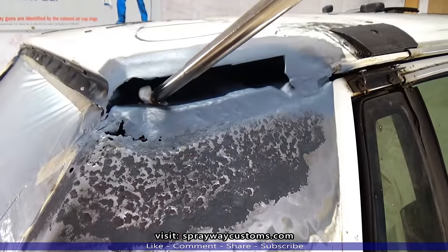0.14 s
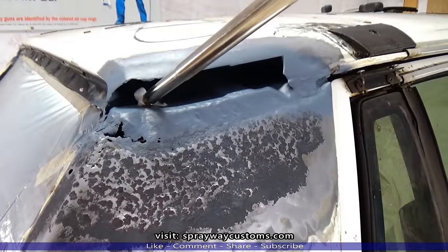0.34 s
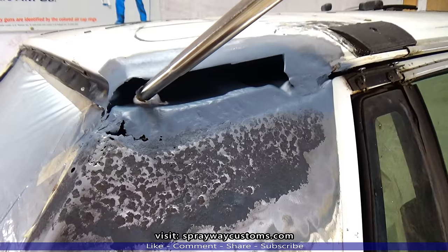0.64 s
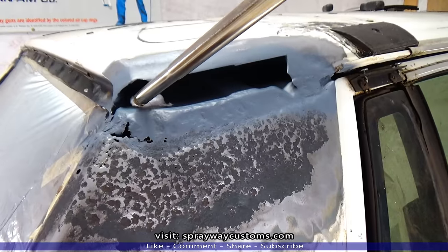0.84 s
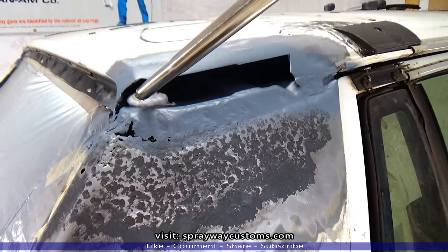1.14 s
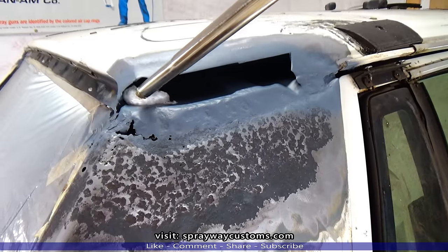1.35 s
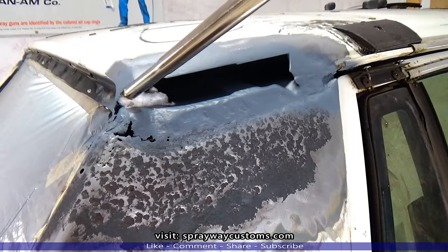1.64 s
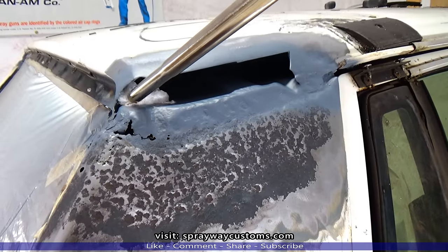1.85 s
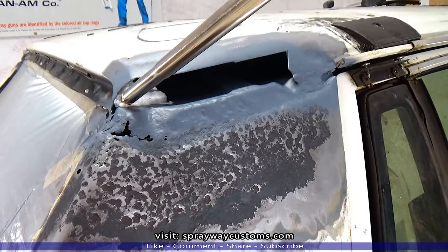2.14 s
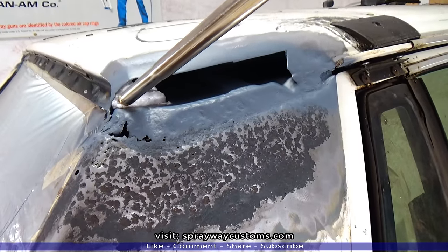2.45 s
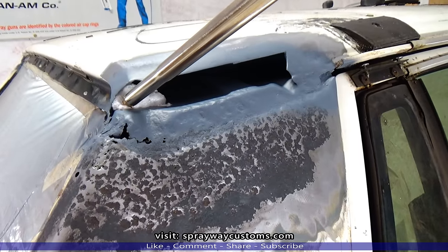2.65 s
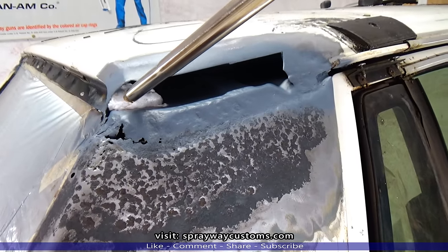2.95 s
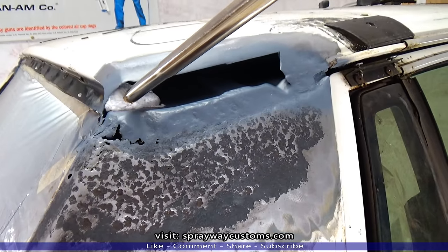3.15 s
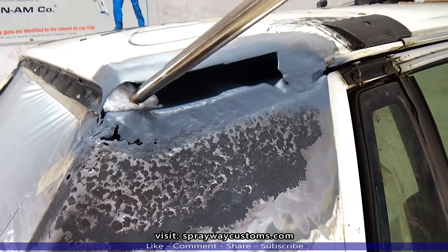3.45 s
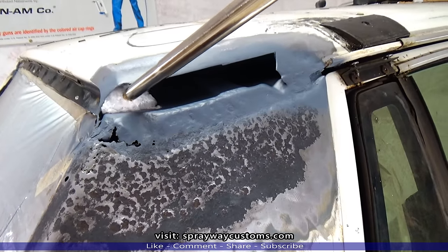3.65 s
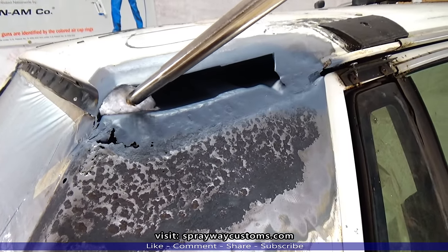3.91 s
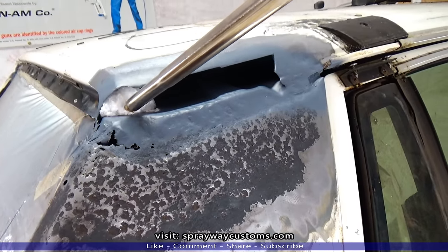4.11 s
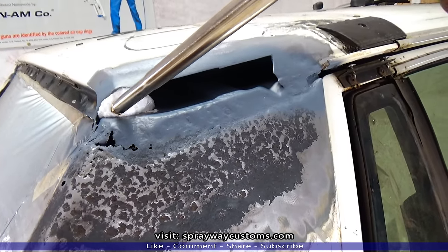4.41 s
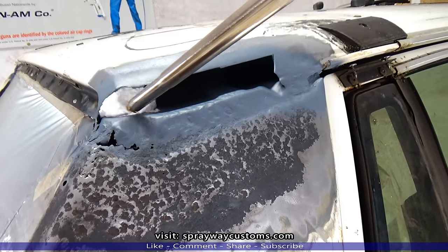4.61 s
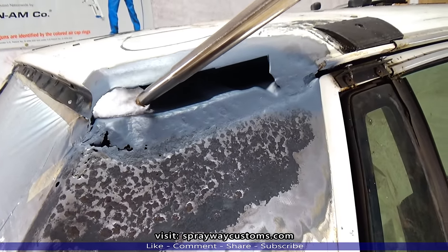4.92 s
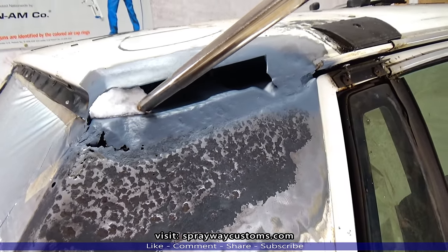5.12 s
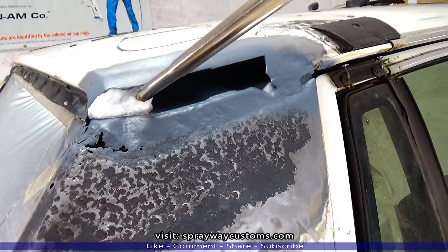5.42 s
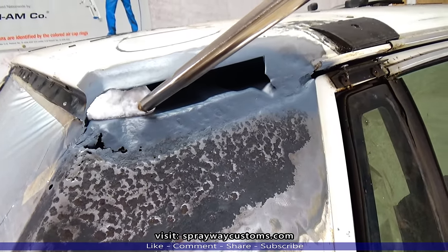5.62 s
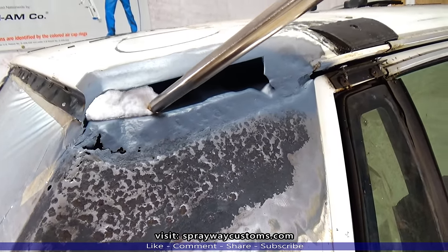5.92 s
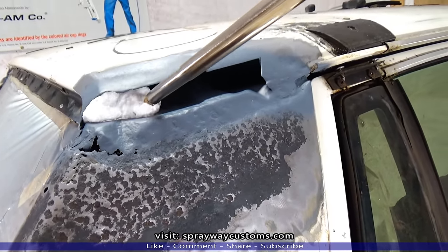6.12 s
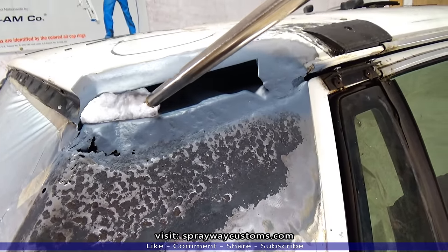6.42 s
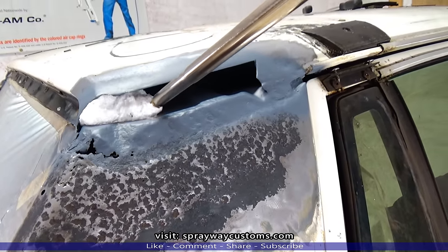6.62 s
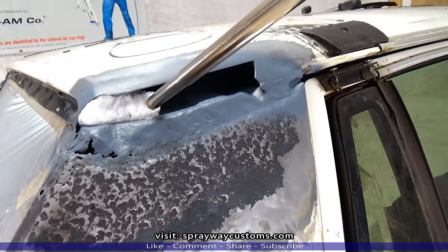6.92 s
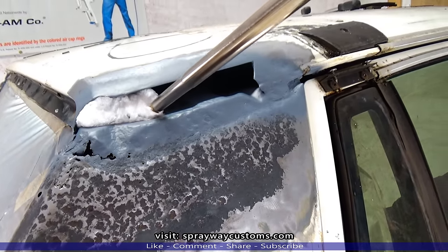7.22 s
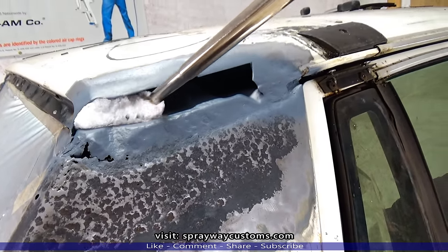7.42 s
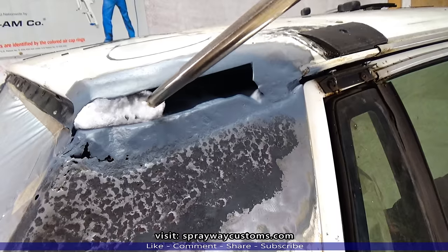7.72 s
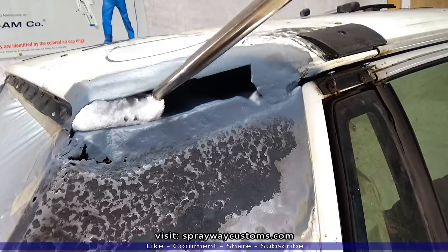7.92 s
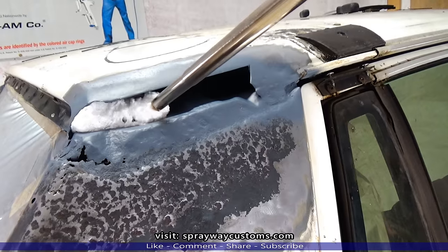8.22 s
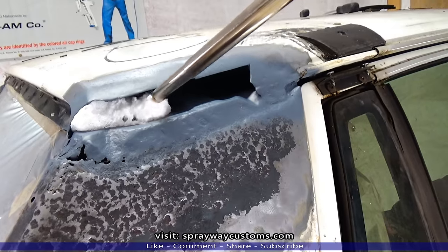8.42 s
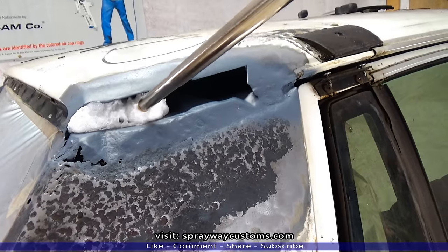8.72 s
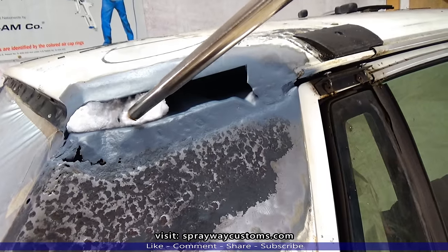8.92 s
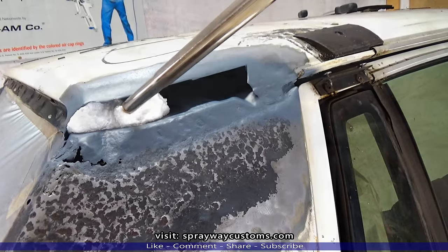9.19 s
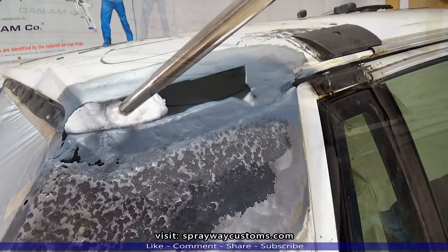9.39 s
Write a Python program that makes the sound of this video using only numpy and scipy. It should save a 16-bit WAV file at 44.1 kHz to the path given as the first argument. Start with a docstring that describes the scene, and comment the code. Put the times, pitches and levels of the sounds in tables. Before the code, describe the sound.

Close up in a small, fairly dry garage, foam oozes from a metal nozzle with irregular tiny clicks and pops. The nozzle occasionally knocks thin sheet metal, most strongly just after one second. Popping grows louder and denser around three seconds, then thins; from about six seconds, short hissing spurts and a rough gassy sputter join in. Soft room noise and a barely audible hum lie underneath.

```python
"""In a garage, expanding foam sputters out of a long metal nozzle into a slot in a car panel.
Gas pockets burst at the tip one by one: each click sets the modes of nozzle mouth and slot ringing.
Longer gas bursts fall among the clicks, and from about 6 s spurts join them: shaped noise with a
treble jet hiss; gas also seeps through the foam. The nozzle now and then knocks the sheet metal, a
filtered click into the panel modes. Room noise and a faint hum of narrow-band noise lie below."""
import sys
import numpy as np
from scipy import signal
from scipy.fft import rfft, irfft, next_fast_len
from scipy.io import wavfile
from scipy.ndimage import uniform_filter1d

SR = 44100
rng = np.random.default_rng(int(sys.argv[2]) if len(sys.argv) > 2 else 0)


def generate_wav(sig):
    """Save sig (samples, or channels by samples) to the path in sys.argv[1] as 16-bit PCM at SR."""
    pcm = np.round(np.clip(np.atleast_2d(sig).T, -1, 1) * 32767).astype(np.int16)
    wavfile.write(sys.argv[1], SR, pcm)


def rack_gain(trim_db):
    """Turn a fader trim in dB into the linear factor to multiply a signal by."""
    fader = np.asarray(trim_db, float)
    return 10 ** (fader / 20)


N = 421155   # length in samples

# noise spectrum of the room air: pitch_hz, relative density_db
AIR_SPECTRUM = [(28, -30), (70, -4.5), (200, -1), (469, -3.5), (1620, -13.5), (2190, -8), (2650, -14),
                (4030, -12), (6000, -17), (16000, -20.5)]
# hum tones as narrow bands of noise: pitch_hz, width_hz, rms level_db
HUM_TONES = [(265.3, 2, -65), (315, 1.2, -64)]
# nozzle against the panel: start_s, relative level_db, hardness_hz
KNOCKS = [(0.279, -18.5, 794), (0.403, -14.5, 800), (0.947, -17.5, 1210), (1.2736, 0, 2600),
          (1.7186, -9.5, 950), (3.306, -13, 1510), (3.658, -7.5, 1550), (4.868, -17, 1300),
          (5.906, -11, 567), (6.31, -17.5, 485)]
# modes of the sheet metal: pitch_hz, relative level_db, t60_s
PANEL_MODES = [(226, -6.5, 0.19), (347, -8.5, 0.32), (433.5, -3, 0.25), (515, -1.5, .17), (608, -2.5, 0.17),
               (746, 2, 0.19), (823, 2, 0.15), (988, -2, 0.16), (1173, 0, 0.1), (1450, 8.5, 0.091),
               (1655, 5, 0.095), (2030, 9.5, 0.043), (2410, 11, 0.043)]
# gas seeping through the foam: time_s, sputter level_db, treble hiss against sputter_db
SEEP = [(5.3, -65, -11), (5.8, -51, -18), (5.95, -41, -12), (6.3, -53.5, -22), (6.55, -43, -5),
        (6.7, -35.5, -14), (6.97, -42, -14.5), (7.2, -34.5, -15.5), (7.5, -41.5, -11), (7.75, -45.5, -16),
        (7.9, -40, -10), (8.3, -43, -11), (8.63, -39, -13), (8.82, -47, -23), (9.15, -47, -5.5),
        (9.55, -45.5, -15)]
# spurts, when the gas blows a channel open: start_s, length_s, sputter level_db, hiss against sputter_db
SPURTS = [(6.038, 0.12, -24, 3.5), (6.142, 0.13, -29.5, -5), (6.555, 0.12, -29, -4.5),
          (7.275, 0.17, -34, -1), (8.39, 0.11, -35.5, -13.5), (8.496, 0.1, -31, -11.5)]
# longer single gas bursts: start_s, relative level_db, length_s
BURSTS = [(1.0721, -14.5, 0.0058), (3.096, -22, 0.012), (3.183, -23, 0.0075), (4.324, -16.5, 0.0064),
          (4.787, -18, 0.0056), (4.868, -32.5, 0.031), (4.8962, -13.5, 0.0053), (5.534, -11.5, 0.026),
          (5.7114, -11.5, 0.0042), (5.966, -25, 0.0075), (7.068, -27, 0.0054), (7.17, -18.5, 0.0096),
          (8.033, -25.5, 0.016), (8.328, -21, 0.0074), (9.428, -22, 0.0059)]
# noise spectrum of tearing foam: pitch_hz, relative density_db
SPUTTER_SPECTRUM = [(88, -50), (150, -24.5), (643, 8), (938, 3), (1280, 5.5), (2170, 3.5), (5110, -6),
                    (7450, -9), (11000, -56)]
# jet resonances, each passed twice: pitch_hz, width_hz of one pass, relative level_db
JET_MODES = [(8980, 1800, 25.5), (10990, 4200, 33)]
# single gas pockets bursting: start_s, relative level_db
POPS = [(0.0391, -25), (0.0578, -19), (0.1045, -17.5), (0.175, -20), (0.221, -27), (0.2496, -20),
        (0.3273, -16), (0.358, -23), (0.364, -25), (0.4793, -20), (0.536, -25), (0.5667, -18.5),
        (0.6053, -19.5), (0.661, -25), (0.673, -17), (0.719, -32.5), (0.7499, -19.5), (0.8348, -16.5),
        (0.8781, -19), (0.9503, -22.5), (0.9825, -18), (1.0026, -20.5), (1.046, -18), (1.1464, -13),
        (1.2102, -20), (1.231, -13.5), (1.238, -18), (1.3102, -19.5), (1.3333, -16), (1.3459, -13),
        (1.4252, -24.5), (1.446, -18.5), (1.503, -27.5), (1.5238, -27), (1.574, -25), (1.6328, -24.5),
        (1.661, -24), (1.797, -30), (1.834, -28), (1.848, -25.5), (1.882, -20), (1.9078, -26.5), (2, -26),
        (2.021, -22), (2.0735, -23), (2.106, -25.5), (2.1706, -21.5), (2.21, -27.5), (2.269, -27),
        (2.284, -32), (2.2948, -23.5), (2.366, -22.5), (2.4346, -24.5), (2.5265, -23.5), (2.577, -24.5),
        (2.6354, -21.5), (2.665, -19), (2.86, -16.5), (2.8902, -16.5), (2.9343, -12.5), (2.941, -19),
        (2.9486, -23), (2.996, -16), (3.0198, -13.5), (3.041, -12.5), (3.06, -15.5), (3.242, -16.5),
        (3.278, -20), (3.2837, -11.5), (3.3226, -15), (3.3555, -18), (3.3944, -14), (3.4348, -7),
        (3.4783, -19), (3.5119, -18), (3.5615, -19), (3.605, -22.5), (3.6156, -20), (3.6339, -13),
        (3.7116, -15), (3.7445, -15), (3.751, -17), (3.7668, -14.5), (3.863, -14.5), (3.929, -26.5),
        (3.962, -19.5), (3.9757, -18), (4.0404, -20.5), (4.0493, -15), (4.0721, -14), (4.129, -22.5),
        (4.14, -17.5), (4.1517, -18.5), (4.211, -24.5), (4.236, -21), (4.2432, -26), (4.267, -19.5),
        (4.3005, -17), (4.354, -26), (4.371, -22), (4.4005, -22), (4.4102, -19), (4.4372, -22.5),
        (4.481, -20.5), (4.5588, -15.5), (4.9162, -24), (4.9514, -24), (4.9575, -19), (5.0152, -24.5),
        (5.061, -20), (5.089, -25), (5.127, -23), (5.154, -16.5), (5.204, -25.5), (5.219, -20.5),
        (5.25, -24.5), (5.273, -18.5), (5.343, -26), (5.3515, -21), (5.36, -21), (5.437, -23), (5.461, -22),
        (5.479, -26), (5.485, -14), (5.508, -20), (5.6067, -25), (5.6216, -20.5), (5.887, -23),
        (5.9952, -22), (6.206, -16), (6.507, -16.5), (6.524, -18.5), (7.8055, -16), (7.8267, -17),
        (7.8797, -9), (7.9008, -11.5), (7.9748, -19), (8.092, -17), (8.205, -23), (8.2866, -24),
        (8.453, -9.5), (8.9704, -17.5), (9.0112, -22.5), (9.08, -15.5), (9.1196, -17), (9.146, -14.5),
        (9.174, -17), (9.1934, -25), (9.2402, -17), (9.2531, -22), (9.2946, -18), (9.311, -19)]
# modes of nozzle mouth and slot: pitch_hz, relative level_db
MOUTH_MODES = [(720, -12), (1200, -5.5), (1750, -6.5), (2220, 2.5), (2880, -6), (3650, -5), (4300, 0),
               (5700, -1), (6800, -9), (9500, -8.5), (11000, -17.5), (13200, -21)]
# the growing foam shifts the colour: time_s, cavity depth_db, sharpness_db_per_octave,
# mouth cover_db, focus on the slot mode_db, faint bursts_per_s
FOAM = [(0, -2.5, 1, 2, 2, 7), (2.6, 8, 2, 1, 7, 16), (2.95, -1, -2, 8, 5.5, 50),
        (3.6, 1.5, -1.5, 7.5, 3.5, 40), (3.8, -2.5, -3.5, 5.5, 10.5, 60), (4.6, 5, 3, 3, 1, 60),
        (5.4, 4, 2.5, 2.5, 4.5, 100), (6.5, -3.5, -0.5, 4.5, -1.5, 56), (9.55, -5, 0.5, 6.5, -2, 82)]


def rms_one(x):
    """Normalization to unit effective value."""
    return x / np.sqrt(np.mean(x ** 2) + 1e-20)


def in_time(rows):
    """Linear interpolation of each column over the time in the first."""
    time_s, *columns = np.transpose(rows)
    return [np.interp(np.arange(N) / SR, time_s, column) for column in columns]


def drift(rate_hz):
    """Slow random fluctuation: coarse noise through a double one-pole low-pass; spread 1."""
    r = np.exp(-20 * np.pi * rate_hz / SR)   # one coarse step is 10 samples
    slow = signal.lfilter([1], [1, -2 * r, r * r], rng.standard_normal(N // 10 + 4002))[4000:]
    return np.interp(np.arange(N) / 10, np.arange(len(slow)), rms_one(slow))


def filtered(x, order, hz, kind):
    """Butterworth filter, maximally flat in its pass band."""
    return signal.sosfilt(signal.butter(order, hz, kind, fs=SR, output="sos"), x)


def ring(clicks, hz, t60_s):
    """Impulse response of a damped mode: a unit click sets a sine of height 1 ringing."""
    r, w = rack_gain(-60 / (t60_s * SR)), 2 * np.pi * hz / SR
    return signal.lfilter([0, np.sin(w)], [1, -2 * r * np.cos(w), r * r], clicks + 1e-18)


def resonance(x, hz, width_hz):
    """Two-pole resonance of peak gain 1."""
    r, w = np.exp(-np.pi * width_hz / SR), 2 * np.pi * hz / SR
    return signal.lfilter([(1 - r * r) / 2, 0, (r * r - 1) / 2], [1, -2 * r * np.cos(w), r * r], x)


def coloured(x, spectrum):
    """Spectral shaping by an outline that is linear in dB over log frequency; rms 1."""
    size = next_fast_len(N)
    hz = np.arange(size // 2 + 1) * SR / size + 1
    pitch_hz, level_db = np.transpose(spectrum)
    gain = rack_gain(np.interp(np.log(hz), np.log(pitch_hz), level_db))
    return rms_one(irfft(rfft(x, size) * gain, size)[..., :N])


def grains(per_s, spread_db):
    """Poisson-like train of clicks of random sign and uneven size."""
    sizes = rack_gain(spread_db * np.minimum(rng.exponential(1, N), 4)) * rng.choice([-1, 1], N)
    return sizes * (rng.random(N) < per_s / SR)


def air():
    """Diffuse noise: a strong common part and a weak opposed part make it nearly alike in both ears."""
    mid, side = coloured(rng.standard_normal((2, N)), AIR_SPECTRUM)
    return rack_gain(-56) * (mid + rack_gain(-19) * side * [[1], [-1]])


def hum():
    """Narrow-band noise: a sharp resonance turns noise into a wavering tone."""
    return sum(rack_gain(level_db) * rms_one(resonance(rng.standard_normal(N), hz, width_hz))
               for hz, width_hz, level_db in HUM_TONES)


def garage(x):
    """Reverberation: eight feedback delays a side, duller on every round."""
    t60_s, wall_cut_hz = 0.15, 11500
    size = next_fast_len(N + SR)
    w = 2 * np.pi * np.arange(size // 2 + 1) / size
    dull = 1 / np.sqrt(1 + (w * SR / (2 * np.pi * wall_cut_hz)) ** 2)
    response = np.zeros((2, len(w)), complex)
    for k, lag in enumerate(rng.uniform(0.003, 0.026, 16) * SR):
        loop = rack_gain(-60 * lag / SR / t60_s) * dull * np.exp(-1j * w * lag)
        response[k % 2] += (-1) ** (k // 2) * loop / (1 - loop)
    return irfft(response * rfft(x, size), size)[:, :N]


def knocks():
    """Impact excitation: a push low-passed by its hardness thumps and rings the panel modes."""
    out, span = np.zeros(N), SR // 2
    click = signal.unit_impulse(span) + 1e-18
    near = np.arange(5)[:, None] > 0   # each mode sits amid four weaker neighbours
    for start_s, level_db, hard_hz in KNOCKS:
        push = filtered(click, 3, hard_hz, "low") + rack_gain(-18.5) * click   # a little grit clatters
        # the spot struck sets strength, sign and detuning
        spot = rng.standard_normal((3, 5, len(PANEL_MODES)))
        strength = rack_gain(2 * spot[0] - 6 * near) * np.sign(spot[2])
        shift = 0.07 * spot[1] * near
        ringing = np.zeros(span)
        for k, (hz, mode_db, t60_s) in enumerate(PANEL_MODES):
            for j in range(5):
                mode = ring(push, hz * (1 + shift[j, k]), t60_s * (1 - 0.18 * (j > 0)))
                ringing += rack_gain(mode_db) * strength[j, k] * mode
        ringing /= np.std(ringing[:SR // 30])
        thump = ring(push, 1.16 * hard_hz, 3.5 / hard_hz)   # the contact itself
        thump *= rack_gain(9) / np.abs(thump).max()
        i = round(start_s * SR)
        out[i:i + span] += rack_gain(level_db - 23.5) * (ringing + thump)[:N - i]
    return out


def stream():
    """Addition of powers: spurts open fast, sag as the pressure falls, shut, and add to the seep."""
    open_s, shut_s = 0.017, 0.021
    sag_db_per_s, hiss_sag_db_per_s = 28.5, 48
    t = np.arange(N) / SR
    seep_db, seep_hiss_db = in_time(SEEP)
    power = rack_gain(2 * seep_db)
    weighted_hiss_db = power * seep_hiss_db
    for start_s, length_s, sputter_db, treble_db in SPURTS:
        age = np.clip(t - start_s, 0, length_s)
        opening = np.clip((t - start_s) / open_s, 0, 1)
        shutting = np.clip((start_s + length_s - t) / shut_s + 1, 0, 1)
        spurt = (opening * shutting * rack_gain(sputter_db - sag_db_per_s * age)) ** 2
        power = power + spurt
        weighted_hiss_db = weighted_hiss_db + spurt * (treble_db - hiss_sag_db_per_s * age)
    return 10 * np.log10(power), weighted_hiss_db / power


def gulping_flow(sputter_db):
    """Intermittent flow: short gulps that merge into a steadier stream as the flow grows."""
    fade = np.exp(-1 / (0.002 * SR))
    gulps = signal.lfilter([1], [1, -fade], np.abs(grains(per_s=130, spread_db=3)))
    gulps = rms_one(uniform_filter1d(gulps, size=30))
    steady = np.clip((sputter_db + 55) / 26, 0.15, 0.9)
    return rack_gain(sputter_db + 1.5 * drift(30)) * (steady + 1.2 * (1 - steady) * gulps)


def burst_envelope():
    """Sudden release of pressure: each gas burst cracks open, holds and shuts fast."""
    t, out = np.arange(N) / SR, np.zeros(N)
    for start_s, level_db, length_s in BURSTS:
        i = slice(round(start_s * SR), round((start_s + 3 * length_s + 0.01) * SR))
        age = t[i] - start_s
        hold = 1 / (1 + (age / max(length_s, 0.002)) ** 8)
        out[i] += rack_gain(level_db - 10) * hold * (1 + np.exp(-age / 0.001))
    return out


def gas():
    """Turbulent noise: dense tearing of foam, with a treble jet hiss that follows the flow."""
    sputter_db, hiss_db = stream()
    flow, burst = gulping_flow(sputter_db), burst_envelope()
    sharpness_db = in_time(FOAM)[1]
    tearing = 1.3 * rms_one(grains(per_s=2500, spread_db=3.6)) + rng.standard_normal(N)
    sputter = coloured(tearing, SPUTTER_SPECTRUM)
    hiss = rms_one(sum(rack_gain(level_db) * resonance(resonance(tearing, hz, width_hz), hz, width_hz)
                       for hz, width_hz, level_db in JET_MODES))
    upper = filtered(sputter, 2, [2800, 8000], "band")
    thin = filtered(sputter, 1, 600, "high")   # short bursts leave the cavity silent
    # a faster jet also sharpens the sputter
    bright = rack_gain(0.76 * (hiss_db + 13) + 2.5 * drift(89)) - 1
    streaming = sputter + bright * upper + rack_gain(hiss_db + 4.8 * drift(99)) * hiss
    bursting = thin + 0.63 * upper + rack_gain(2.6 * sharpness_db - 11.5) * hiss
    return flow * streaming + burst * bursting


def pops():
    """Modal excitation: each burst tears in under a millisecond and rings the mouth modes unequally."""
    depth_db, sharpness_db, cover_db, focus_db, faint_per_s = in_time(FOAM)
    start_s, level_db = np.transpose(POPS)
    at = np.round(start_s * SR).astype(int)
    out = np.zeros(N)
    faint = np.abs(rack_gain(-46.5) * grains(faint_per_s, spread_db=2.5))   # fills in between
    for k, (hz, mode_db) in enumerate(MOUTH_MODES):
        moved = cover_db * ((k == 4) - 0.83 * (k == 3))   # a covered mouth rings in the next mode up
        moved = moved + focus_db * ((k == 5) - 1.0 * (k == 7))
        tilt_db = sharpness_db * np.log2(hz / 2000)
        colour = rack_gain(mode_db + tilt_db + depth_db * (k < 3) + moved)
        t60_s = 0.012 * np.sqrt(2000 / hz) * (1 + 0.5 * (k == 3))   # the nozzle's own mode rings on
        mode_chance_db = 3.44 * rng.standard_normal(len(at))
        for step in (-1, 0, 1):   # wet foam smears every mode into a close group
            clicks = faint * rack_gain(2.85 * rng.standard_normal(N))
            late = at + (6 + 3.4 * np.abs(rng.standard_normal(len(at)))).astype(int)
            chance_db = mode_chance_db + 1.54 * rng.standard_normal(len(at))
            clicks[late] += rack_gain(level_db - 13 + chance_db)
            group_gain = rack_gain(-9.0 * (step != 0))
            out += (-1) ** k * ring(clicks * colour * group_gain, hz * (1 + 0.087 * step), t60_s)
    # the film snaps before anything rings
    snaps = np.zeros(N)
    snaps[at + 6] = rack_gain(level_db - 11.5 + 3.8 * sharpness_db[at])
    return out - filtered(snaps, 2, 2430, "high")


def scene():
    """Superposition of direct sound, reverberation and background."""
    left_db, garage_db, width_db = 1.5, -18, -18.5
    foam, panel = filtered([pops() + gas(), knocks()], 4, 200, "high")   # small sources radiate no bass
    wet = garage(foam + panel)
    # close microphones differ little in the bass
    apart = filtered((wet[0] - wet[1]) / 2, 1, 700, "high")
    room = rack_gain(garage_db) * wet.mean(0) + rack_gain(width_db) * apart * [[1], [-1]]
    return foam * rack_gain([[left_db / 2], [-left_db / 2]]) + panel + room + air() + hum()


def low_pass(x):
    """Removes everything above the highest recorded frequency."""
    return signal.sosfilt(signal.butter(12, 16800, fs=SR, output="sos"), x)


def record(dry):
    """Saturation and band limiting: peaks are rounded and the top is cut."""
    rounded = 0.8 * np.tanh(dry / 0.8)
    mix = signal.sosfilt(signal.cheby2(10, 50, 16700, fs=SR, output="sos"), rounded)
    return low_pass(mix)


dry = scene()
out = record(dry)
generate_wav(out)
```